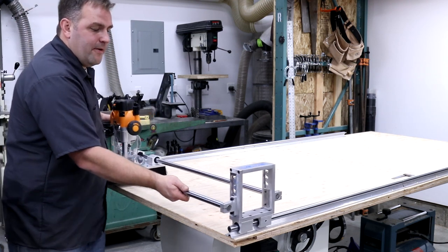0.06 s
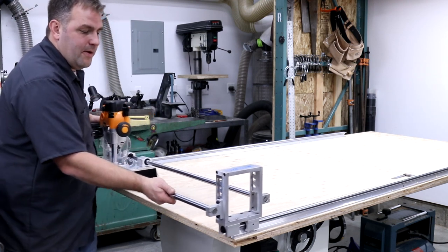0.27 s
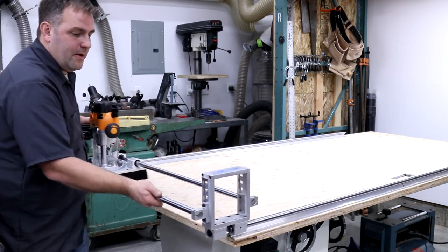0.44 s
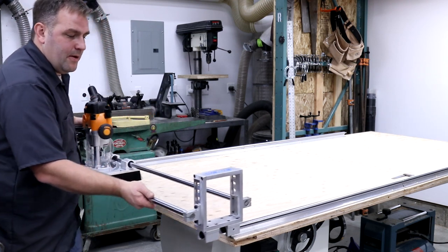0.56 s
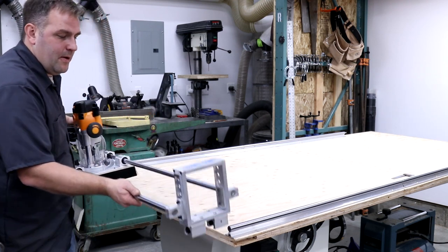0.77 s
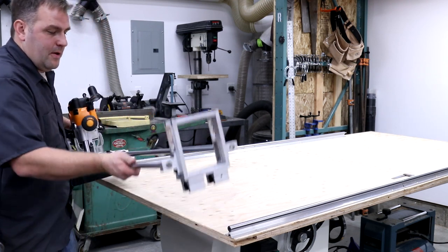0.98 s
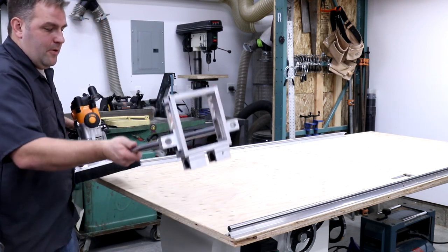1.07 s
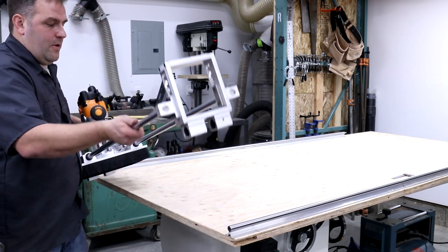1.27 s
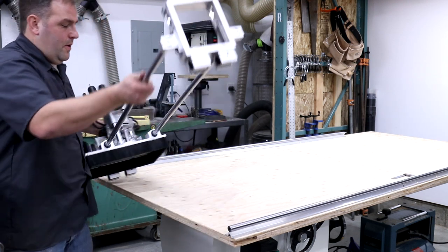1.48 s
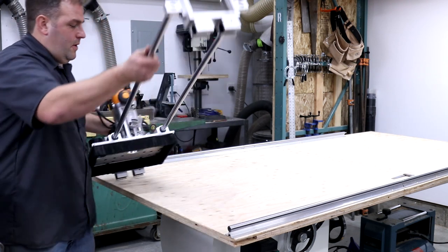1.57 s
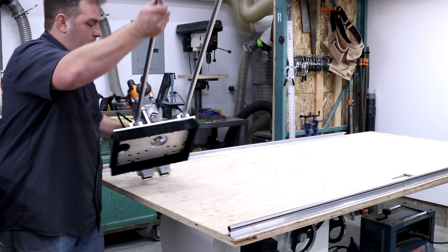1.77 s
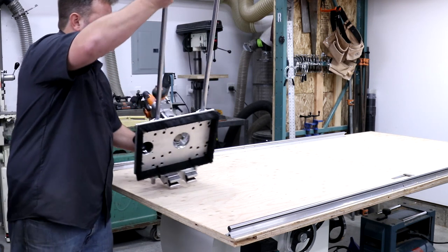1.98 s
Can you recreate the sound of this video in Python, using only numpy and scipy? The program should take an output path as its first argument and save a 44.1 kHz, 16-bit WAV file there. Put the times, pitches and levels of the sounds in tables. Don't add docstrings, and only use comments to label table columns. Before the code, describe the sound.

Metal sliding on a metal rail with dull bumps and clinks, then one rattling knock

```python
import sys
import numpy as np
from scipy import signal
from scipy.fft import rfft, irfft
from scipy.io import wavfile
from scipy.ndimage import uniform_filter1d

SR = 44100
rng = np.random.default_rng(int(sys.argv[2]) if len(sys.argv) > 2 else 0)


def unload_wav(signal):
    wavfile.write(
        sys.argv[1],
        SR,
        np.round(np.clip(np.atleast_2d(signal).T, -1, 1) * 32767).astype(np.int16),
    )


def boost_factor(decibels):
    exponent = np.asarray(decibels, float) / 20
    return 10 ** exponent


N = 89522


def rms_one(x):
    return x / np.sqrt(np.mean(x ** 2) + 1e-20)


def at_hz(points, hz):
    table_hz, values = np.transpose(points)
    return np.interp(np.log(hz), np.log(table_hz), values)


def drift(rate_hz):
    pole = np.exp(-80 * np.pi * rate_hz / SR)
    noise = rng.standard_normal(N // 40 + 2002)
    slow = signal.lfilter([1], [1, -2 * pole, pole * pole], noise)[2000:]
    return np.interp(np.arange(N) / 40, np.arange(len(slow)), rms_one(slow))


def colour(x, spectrum):
    hz = np.maximum(np.arange(N // 2 + 1) * SR / N, 1)
    return rms_one(irfft(rfft(x) * boost_factor(at_hz(spectrum, hz)), N))


def ring(x, hz, t60_s):
    r, w = boost_factor(-60 / (t60_s * SR)), 2 * np.pi * hz / SR
    return signal.lfilter([0, np.sin(w)], [1, -2 * r * np.cos(w), r * r], x + 1e-18)


def band(x, low_hz, high_hz, order=2):
    edges_hz = [low_hz, min(high_hz, .45 * SR)]
    return signal.sosfilt(signal.butter(order, edges_hz, "band", fs=SR, output="sos"), x)


def add_at(out, start_s, event):
    i = int(start_s * SR)
    out[i:i + len(event)] += event


def shop_hum():
    # (frequency [Hz], level [dB])
    hum_colour = [(18, -44), (30, -34), (243, 1.5), (269, -7), (560, -10), (655, -12.5), (1330, -14.5),
                  (1910, -23), (15500, -38)]
    return boost_factor(-67) * colour(rng.standard_normal(N), hum_colour)


def shop_ring(x):
    # (frequency [Hz], t60 [s])
    shop_t60 = [(80, 0.67), (200, 0.52), (500, 0.49), (1200, 0.55), (4000, 0.62), (12000, 0.28)]
    wet_db, build_s = -7.5, 0.011
    t = np.arange(SR) / SR
    edges_hz = 50 * 2 ** np.arange(0, 8.6, .5)
    noise = rng.standard_normal((2, SR))
    tail = np.zeros(SR)
    for k, (low_hz, high_hz) in enumerate(zip(edges_hz, edges_hz[1:])):
        t60_s = at_hz(shop_t60, np.sqrt(low_hz * high_hz))
        tail += band(noise[k % 2], low_hz, high_hz) * boost_factor(-60 * t / t60_s)
    tail = tail * np.clip(t / build_s, 0, 1)
    return boost_factor(wet_db) * signal.fftconvolve(x, tail / np.sqrt(np.sum(tail ** 2)))[:N]


def table_boom():
    # (time [s], level [dB])
    pushes = [(0.0, -94), (0.049, -84), (0.22, -116), (0.28, -66), (0.32, -78), (0.37, -49), (0.49, -75),
              (0.57, -48), (0.84, -58.5), (0.9, -55), (1.11, -69.5), (1.44, -61), (1.47, -55.5),
              (1.75, -64.5), (1.78, -79.5), (2.03, -77.5)]
    mode_hz, wander_hz = 85.1, 4.04
    s, db = np.transpose(pushes)
    phase = 2 * np.pi * np.cumsum(mode_hz + wander_hz * drift(14.0)) / SR
    level_db = np.interp(np.arange(N) / SR, s, db) + 2 + 1.5 * drift(9)
    return boost_factor(level_db) * np.sin(phase)


def ball_ticks():
    # (time [s], peak level [dB])
    snap_events = [(0.0882, -63), (0.2334, -62), (0.248, -49), (0.263, -52), (0.3044, -56), (0.3307, -53),
                   (0.3315, -56), (0.4004, -59), (0.4297, -51), (0.4633, -56), (0.466, -52), (0.490, -48),
                   (0.519, -56), (0.6164, -60), (0.816, -64.5), (0.891, -35), (0.923, -59), (0.9894, -68),
                   (1.0194, -43), (1.094, -53), (1.102, -70), (1.451, -54)]
    fall_s, low_hz, high_hz, gain_db = .0012, 6500, 14500, -3
    out, t = np.zeros(N), np.arange(SR // 20) / SR
    noises = rng.standard_normal((len(snap_events), len(t)))
    for (s, db), noise in zip(snap_events, noises):
        cap_db = -55 if s < .6 else -60
        snap = band(noise * np.exp(-t / fall_s), low_hz, high_hz)
        add_at(out, s, boost_factor(min(db, cap_db) + gain_db) * snap)
    return out


def clinks():
    # (time [s], peak level [dB], frequency [Hz])
    clink_events = [(0.2147, -41.5, 3540), (.425, -46, 3850), (0.477, -34, 2430), (.521, -33, 2330),
                    (.522, -39, 3600), (1.0216, -34.5, 2330), (1.022, -30, 3690), (1.039, -51, 3840),
                    (1.1, -42, 4410), (1.102, -38, 2460), (1.181, -43, 2570), (1.179, -42, 1800),
                    (1.1786, -54, 3150), (1.179, -55, 4020), (1.449, -42.5, 4060), (1.452, -45, 2430),
                    (1.463, -40, 2880), (1.890, -70, 4350)]
    t60_s, rise_s, gain_db, cap_db = .018, .0006, -8, -37
    out, t = np.zeros(N), np.arange(SR // 20) / SR
    noises = rng.standard_normal((len(clink_events), len(t)))
    for (s, db, hz), noise in zip(clink_events, noises):
        rough = rms_one(band(noise, hz / 1.25, hz * 1.25))
        tone = np.sin(2 * np.pi * hz * t) + .7 * rough
        fall = boost_factor(min(db, cap_db) + gain_db - 60 * t / t60_s)
        add_at(out, s, fall * np.clip(t / rise_s, 0, 1) * tone)
    return out


def chatter():
    starts = [.5195, 1.09, 1.437, 1.445, 1.447]
    # (level [dB], length [s], low edge [Hz], high edge [Hz])
    buzzes = [(-58, 0.0031, 980, 5600), (-63.5, 0.043, 3100, 4900), (-60.5, 0.037, 1230, 3960),
              (-74, 0.0089, 7800, 11600), (-57, 0.026, 1160, 3200)]
    rise_s, longest_fall_s = .002, 0.035
    out, t = np.zeros(N), np.arange(SR // 4) / SR
    noises = rng.standard_normal((len(buzzes), len(t)))
    for s, (db, length_s, low_hz, high_hz), noise in zip(starts, buzzes, noises):
        fall_s = min(longest_fall_s, length_s)
        shape = np.clip(t / rise_s, 0, 1) * np.exp(-np.maximum(t - length_s, 0) / fall_s)
        add_at(out, s, boost_factor(db) * rms_one(band(noise, low_hz, high_hz)) * shape)
    return out


def bumps():
    # (time [s], level [dB], length [s], centre [Hz])
    bump_events = [(0.2081, -36.5, 0.0024, 840), (.2145, -39, 0.011, 930), (0.23, -41.5, 0.0037, 1010),
                   (0.221, -39, 0.013, 476), (0.254, -47.5, 0.046, 146.4), (0.291, -46, 0.048, 818),
                   (0.483, -46, 0.026, 1043), (0.519, -36, 0.0022, 468), (.522, -41, 0.0073, 708),
                   (.483, -46, 0.0096, 1160), (.497, -53.5, 0.023, 176), (0.516, -38.5, 0.019, 158.6),
                   (.527, -37.5, 0.0086, 492), (.5415, -37, 0.0058, 290), (0.545, -48, 0.027, 130),
                   (.553, -43.5, 0.0043, 476), (.529, -51.5, 0.007, 950), (0.587, -43, 0.032, 150),
                   (0.663, -48, 0.025, 576), (0.629, -53.5, 0.018, 1100), (.672, -57, 0.02, 1103),
                   (1.073, -46, 0.014, 836), (1.076, -50, 0.011, 378), (1.174, -59.5, 0.023, 122.4),
                   (1.4372, -46.5, 0.00076, 1700), (1.4375, -42.5, 0.012, 482), (1.443, -46, 0.029, 1170),
                   (1.4394, -38.5, 0.0045, 427), (1.454, -38, 0.0033, 580), (1.458, -36, 0.0021, 497),
                   (1.465, -40, 0.014, 500), (1.457, -40, 0.0066, 1110), (1.451, -48, 0.0069, 1460),
                   (1.464, -47, 0.026, 900), (1.47, -48, 0.041, 267), (1.513, -55, 0.005, 574),
                   (1.445, -47, 0.033, 150.7), (1.487, -42, 0.0043, 150), (1.496, -42.5, 0.0027, 332)]
    # (frequency [Hz], level [dB], t60 [s])
    table_modes = [(119, 1.5, 0.15), (149.5, 19.5, 0.071), (247, -17, 0.24), (301.6, -15, 0.45),
                   (328.6, 11, 0.75), (444, -2, 0.35), (490, 8, 0.11), (728, 4.5, 0.13), (840, -24, 0.15),
                   (970, -10, 0.18), (1220, 4, 0.08), (1550, 0, 0.21), (2000, -19, .05), (2330, -18, .1)]
    half_width_oct, rise_s, fall_s, touch_gain = .5, .0015, .006, 1.8
    crack_db, ring_db, tone_below_hz = -32, -8, 260
    push, crack, t = np.zeros(N), np.zeros(N), np.arange(SR // 8) / SR
    draws = rng.standard_normal((len(bump_events), len(t)))
    for (s, db, length_s, hz), contacts in zip(bump_events, draws):
        shape = np.clip(t / rise_s, 0, 1) * np.exp(-np.maximum(t - length_s, 0) / fall_s)
        dull = rms_one(band(contacts, hz / 2 ** half_width_oct, hz * 2 ** half_width_oct))
        dull = dull + np.clip(tone_below_hz / hz, 0, 3) * np.sin(2 * np.pi * hz * t)
        dull = dull / np.sqrt(uniform_filter1d(dull ** 2, size=int(3 * SR / hz)) + 1e-9)
        touch = np.sin(np.pi * np.clip(2 * hz * t, 0, 1)) ** 2
        add_at(push, s, boost_factor(db) * (dull * shape + touch_gain * touch))
        add_at(crack, s, boost_factor(db) * np.clip(hz / 800, 0, 1) * contacts * shape)
    modes = sum(boost_factor(db) * ring(push, hz, t60_s) for hz, db, t60_s in table_modes)
    modes = modes * np.sqrt(np.sum(push ** 2) / np.sum(modes ** 2))
    return band(push, 72, 2200) + boost_factor(ring_db) * modes + boost_factor(crack_db) * band(crack, 1000, 5000)


def grains():
    per_s, spread_db = 6000, 2
    sizes = boost_factor(spread_db * np.minimum(rng.exponential(1, N), 4)) * rng.choice([-1, 1], N)
    hits = rng.random(N) < per_s / SR
    return rms_one(sizes * hits + 0.29 * rng.standard_normal(N))


def slide(rows, spectrum, peaks, load_db, patchy_db, hiss_follows, low_hz):
    # (frequency [Hz], level [dB])
    table_colour = [(59, -35), (100, -7.5), (150, -2), (301, -9), (345, -10), (431, -9), (600, -12.5),
                    (780, -17.5), (1320, -120)]
    peak_share, hiss_from_hz = .4, 4700
    s, level_db, table_db = np.transpose(rows)
    t = np.arange(N) / SR
    db = np.interp(t, s, level_db, left=-120, right=-120)
    load = np.interp(t, s, table_db)

    source = grains() * boost_factor(patchy_db * drift(8.2))
    tones = np.zeros(N)
    for hz, width_hz, peak_db in peaks:
        t60_s = 2.02 / np.clip(width_hz, 35, 400)
        tones += rms_one(ring(source * boost_factor(1.1 * drift(14)), hz, t60_s)) * boost_factor(peak_db)
    body = np.sqrt(1 - peak_share) * colour(source, spectrum) + np.sqrt(peak_share) * rms_one(tones)

    fine = colour(rng.standard_normal(N) * boost_factor(.7 * drift(14)), spectrum)
    fine = fine * boost_factor(np.where(db > -100, (hiss_follows - 1) * (db + 46), 0))
    friction = band(body, low_hz, hiss_from_hz, order=3) + band(fine, hiss_from_hz, 27000, order=3)

    shake = colour(rng.standard_normal(N), table_colour)
    shake = shake * boost_factor(db + load + load_db + 1.0 * drift(9.9))
    return boost_factor(db) * friction + shake


def board_scrape():
    # (time [s], level [dB], load on the table [dB])
    strokes = [(0.8, -71.5, -24), (0.836, -61.5, 4), (0.872, -54.5, 11.5), (0.96, -44, -13),
               (1.035, -42, -7.5), (1.11, -46, 8), (1.132, -54.5, 12), (1.25, -64.5, 0), (1.384, -70, 17),
               (1.42, -62.5, 12)]
    # (frequency [Hz], level [dB])
    spectrum = [(300, -45), (550, -11), (950, -3.5), (1500, 5), (2300, -5.5), (4500, -20), (7000, -36),
                (12000, -39), (15500, -47)]
    # (frequency [Hz], width [Hz], level [dB])
    peaks = [(719, 52, 12), (990, 74, 16), (1180, 98, 14.5), (1440, 19, 7), (2050, 59, 1), (2620, 59, 0.5)]
    return slide(strokes, spectrum, peaks, load_db=-14.5, patchy_db=-1.5, hiss_follows=0.74, low_hz=485)


def rail_drag():
    # (time [s], level [dB], load on the table [dB])
    strokes = [(0, -48, -11.5), (.09, -47, -2), (.2, -46.5, -2.5), (.26, -46, -6.5), (.34, -45, 1.5),
               (.46, -48.5, 3), (.56, -49, 4.5), (.7, -62, 10), (.84, -92.5, 26)]
    # (frequency [Hz], level [dB])
    spectrum = [(260, -28), (450, -13), (700, -12.5), (1300, 4), (2400, -5.5), (4200, -17), (6500, -31.5),
                (11000, -37), (15500, -45)]
    # (frequency [Hz], width [Hz], level [dB])
    peaks = [(616, 31, 10.5), (675, 65, 13.5), (950, 87, 13.5), (1105, 120, 13.5), (1280, 120, 8),
             (1970, 48, -13), (2614, 55, -2.5), (3000, 49, -22)]
    return slide(strokes, spectrum, peaks, load_db=-1, patchy_db=-1.27, hiss_follows=0.83, low_hz=150)


def scene():
    sliding = rail_drag() + board_scrape()
    struck = bumps() + chatter()
    small = ball_ticks() + clinks()
    wet = shop_ring(struck + 0.72 * (sliding + small))
    return (sliding + table_boom() + struck + small + wet + shop_hum())[None]


def top_cut(x):
    return signal.sosfilt(signal.butter(12, 15630, fs=SR, output="sos"), x)


def record(dry):
    low_cut = signal.butter(4, 62, "high", fs=SR, output="sos")
    return top_cut(signal.sosfilt(low_cut, dry))


dry = scene()
out = record(dry)
unload_wav(out)
```